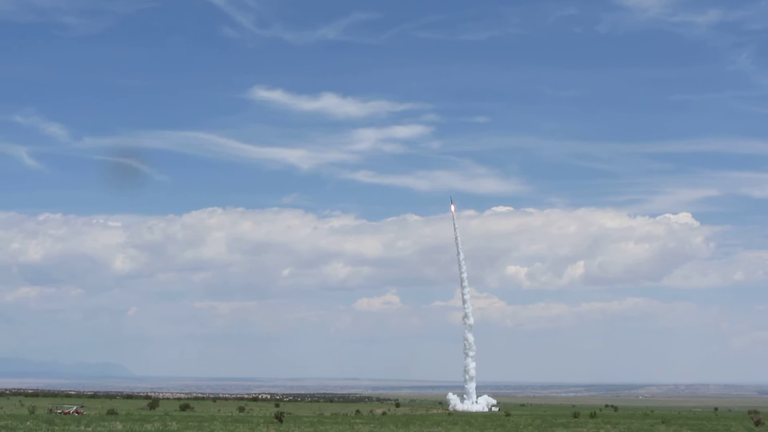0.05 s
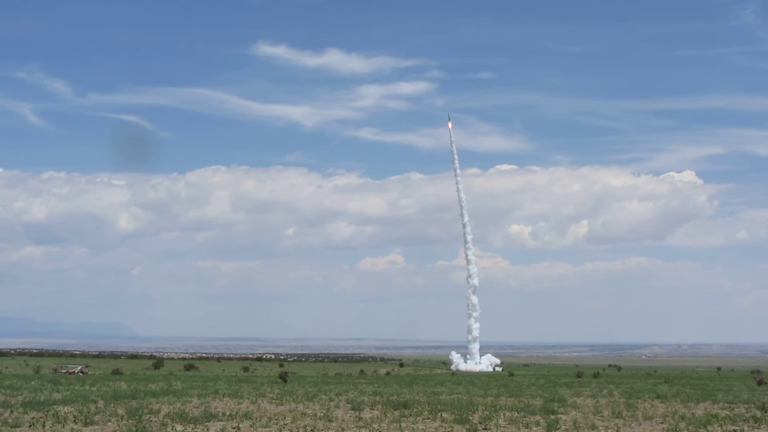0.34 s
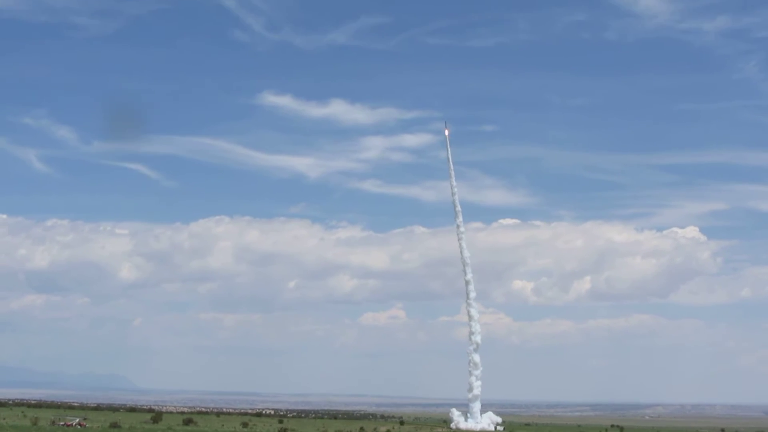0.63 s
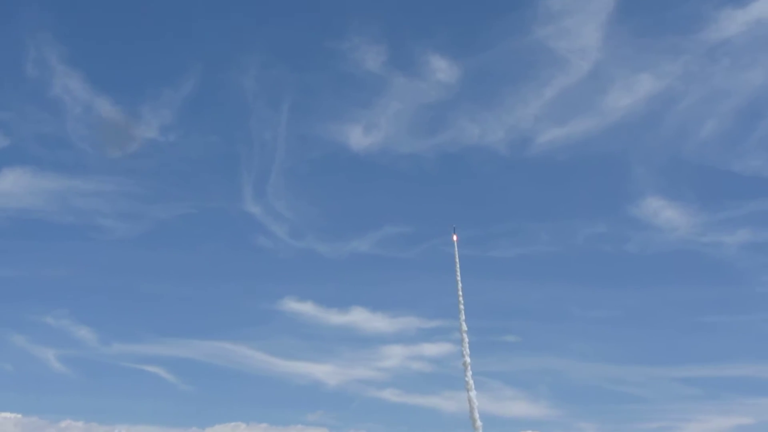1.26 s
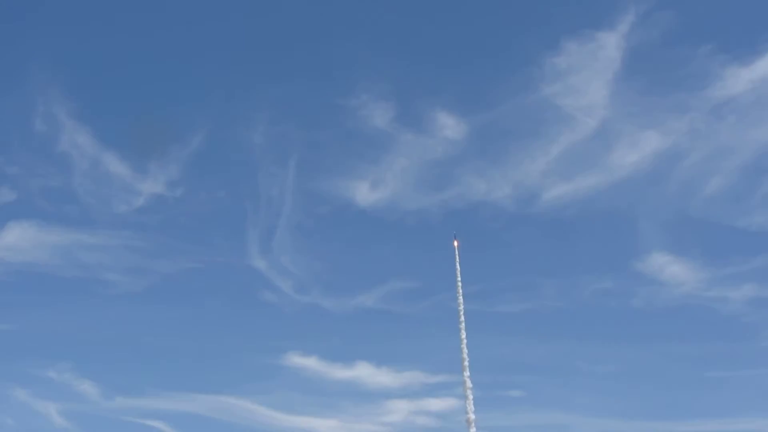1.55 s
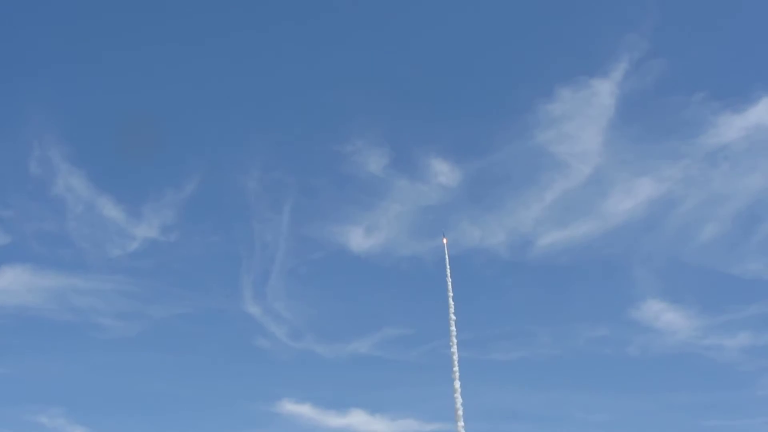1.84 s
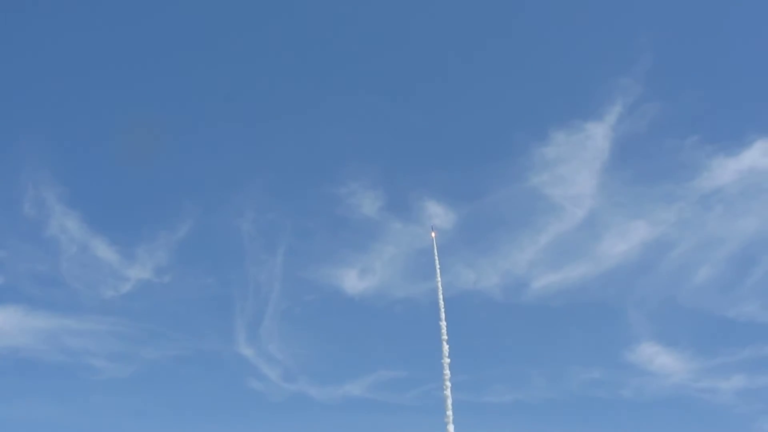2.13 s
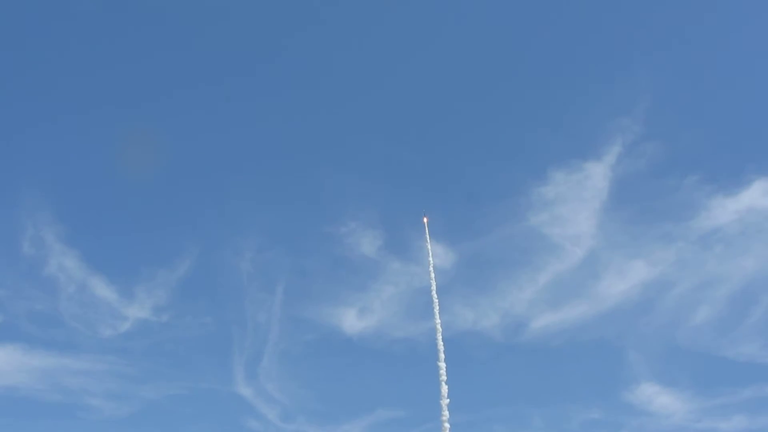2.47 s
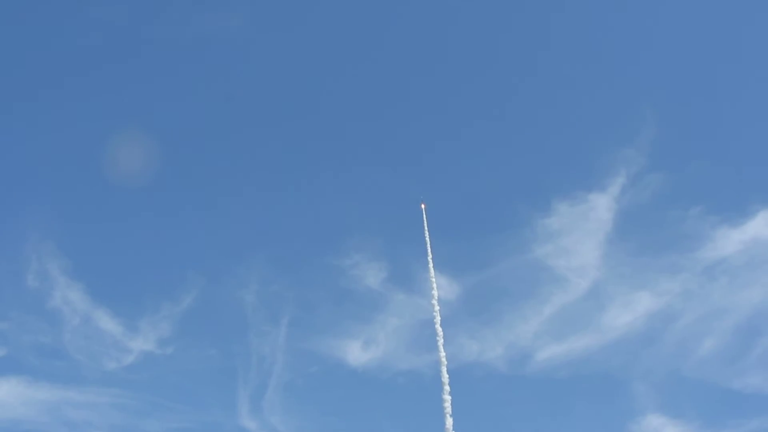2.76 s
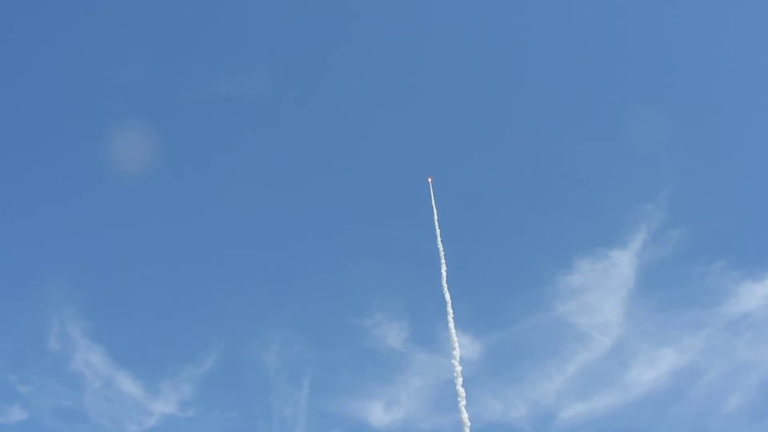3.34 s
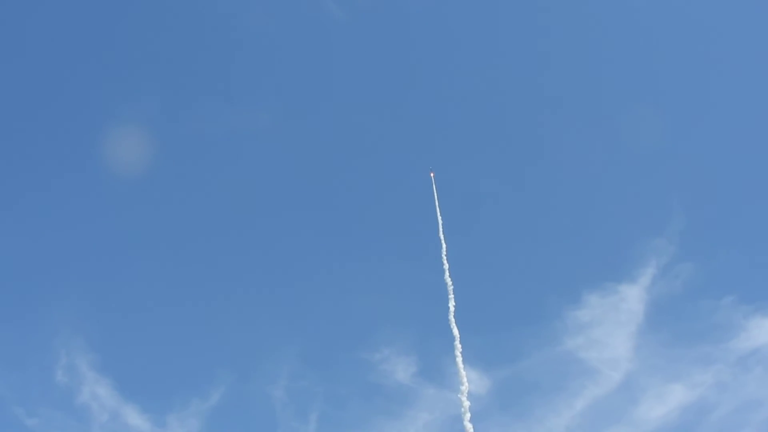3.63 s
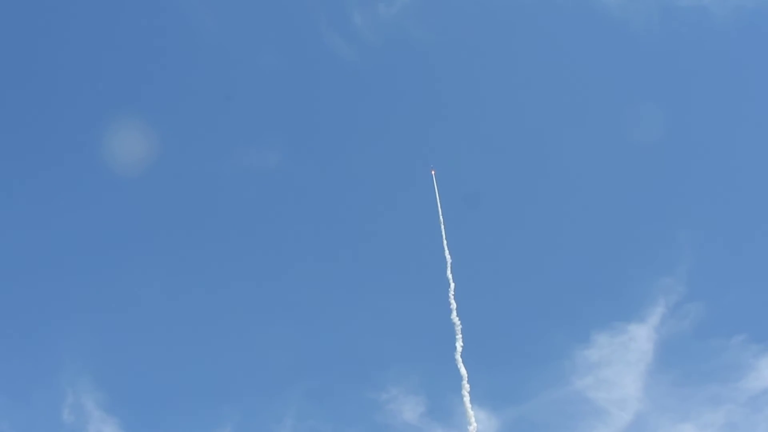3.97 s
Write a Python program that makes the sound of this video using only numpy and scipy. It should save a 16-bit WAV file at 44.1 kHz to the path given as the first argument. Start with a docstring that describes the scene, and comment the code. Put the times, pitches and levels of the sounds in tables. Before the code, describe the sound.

A distant rocket roars throughout, rough and wavering, as it climbs over an open plain. A deep rumble is strongest in the first half second, then eases. The roar surges unevenly, around 0.5, 1.2, 2.2, 2.8 and 3.5 seconds, with short cracks near 0.6, 1.2, 2.6, 2.9 and 3.5 seconds. From about 2 seconds a subtle downward sweep runs through it, and it dulls slightly.

```python
"""A rough roar over a deep rumble: a far-off rocket is climbing away above a grassy plain.
The roar is the jet's churning gas mixed with small shocks (sudden jumps in air pressure). Moving air
makes it swell, fade and change in brightness, and single strong shocks crack through. The echo off
the ground comes later as the rocket rises, so the pitches it cancels slide down through the roar.
Light wind touches the microphone, and the recorder ticks faintly at loud peaks."""
import sys
import numpy as np
from scipy import signal
from scipy.fft import rfft, irfft
from scipy.io import wavfile
from scipy.ndimage import uniform_filter1d, minimum_filter1d, map_coordinates

SR = 44100
rng = np.random.default_rng(int(sys.argv[2]) if len(sys.argv) > 2 else 0)


def waveform_to_disk(signal):
    """Save audio, clipped to [-1, 1], as 16-bit WAV at the path in sys.argv[1]."""
    frames = np.transpose(np.atleast_2d(signal))
    scaled = np.clip(frames, -1, 1) * 32767
    samples = np.round(scaled).astype(np.int16)
    wavfile.write(sys.argv[1], SR, samples)


N = 176400  # 4 seconds

# How each layer swells and fades (time [s], relative level [dB])
ROAR_LEVEL = [(0.0, -16.5), (0.14, -14.5), (0.25, -15), (0.32, -19.5), (0.39, -18.5), (0.46, -12.5),
              (0.54, -20), (0.62, -17.5), (0.66, -17.5), (0.69, -14), (0.84, -27.0), (0.89, -21.5),
              (0.92, -24), (1.02, -18), (1.08, -21), (1.19, -14), (1.39, -20), (1.48, -24.5), (1.59, -20.5),
              (1.73, -25.5), (1.79, -23), (1.92, -24.5), (2.09, -23), (2.13, -16), (2.2, -17.5),
              (2.27, -16.5), (2.31, -25.0), (2.37, -17.5), (2.42, -19), (2.46, -22), (2.5, -20.5),
              (2.58, -20.5), (2.61, -14.5), (2.66, -16.5), (2.69, -18.5), (2.75, -21), (2.79, -16),
              (2.87, -12.5), (2.95, -24.5), (3.02, -18.5), (3.08, -22), (3.2, -17), (3.34, -23.5),
              (3.42, -22), (3.55, -15), (3.65, -20.5), (3.75, -19), (3.79, -17.5), (3.9, -22.5), (4.0, -20)]
TREBLE_LEVEL = [(0.0, -36), (0.12, -31), (0.24, -41.5), (0.36, -44), (0.46, -31.5), (0.51, -34),
                (0.65, -28.5), (0.72, -42), (0.76, -40.5), (0.84, -47.5), (0.9, -39.5), (1.0, -42),
                (1.08, -39), (1.11, -42), (1.19, -34.5), (1.28, -38.5), (1.41, -35.5), (1.45, -40.5),
                (1.62, -42), (1.74, -47.5), (1.79, -44), (1.84, -49.5), (2.05, -49), (2.22, -32),
                (2.3, -42.5), (2.42, -40.5), (2.46, -45), (2.49, -36.5), (2.57, -31), (2.6, -45.5),
                (2.64, -32.5), (2.69, -50), (2.73, -34.5), (2.79, -33), (2.82, -37), (2.92, -36.5),
                (2.95, -40), (3.06, -50.5), (3.13, -38.5), (3.2, -44), (3.33, -46), (3.39, -41.5),
                (3.46, -47), (3.54, -40), (3.61, -47), (3.79, -45.5), (3.84, -50), (4.0, -42)]
RUMBLE_LEVEL = [(0.0, -27), (0.11, -18.5), (0.57, -30), (0.76, -34), (0.92, -24.5), (1.44, -28),
                (1.52, -33.5), (1.86, -32.5), (2.42, -32), (2.76, -34.5), (2.83, -32), (3.05, -35),
                (3.3, -28.5), (3.44, -30.5), (3.77, -28.5), (4.0, -31)]
DEEP_LEVEL = [(0.0, -27.5), (0.23, -38), (0.71, -47.5), (0.92, -48.5), (1.45, -52), (1.61, -45.5),
              (2.05, -44.5), (2.45, -49.5), (3.27, -55), (4.0, -56)]
# How each sound is spread from low to high (frequency [Hz], relative level [dB])
JET_TONE = [(250, -37), (420, -8), (620, 0), (950, -1.5), (1300, -1.94), (2000, -4.5), (2800, -10),
            (3800, -22), (5000, -30), (7000, -52), (10000, -78), (15000, -99)]
RUMBLE_TONE = [(40, -48.5), (90, -17), (150, -6.5), (220, -1), (300, 3), (400, -3.5), (550, -15.5),
               (1000, -41.5), (4000, -87)]
DEEP_TONE = [(20, -26), (35, -23.5), (52, -5.5), (90, 0), (130, 8), (220, -13.5), (1000, -69)]
CRACK_TONE = [(60, -21.5), (250, 4), (800, 9), (2000, -9), (3800, -20.5), (5500, -20), (8000, -43.5),
              (10000, -60.5), (15000, -86)]
RECORDER_TICK_TONE = [(2000, -20), (5000, -1), (8000, 0.5), (11000, -6), (15000, -15)]
# Brief flare-ups in the roar (time [s], centre frequency [Hz], half length [s], boost [dB])
ROAR_FLARES = [(1.361, 680, .09, 8.5), (1.79, 1700, 0.037, 7.5), (2.2, 2100, 0.024, 7.5),
               (2.515, 1305, 0.08, 9.5), (2.642, 1840, 0.012, 6.5), (3.796, 620, 0.057, 7)]
# Loud peaks (time [s], relative shock level [dB], relative recorder tick level [dB])
LOUD_PEAKS = [(.44, -17.5, -47), (.459, -14.5, -42), (0.477, -14.5, -43), (.493, -18.5, -50),
              (.591, -13.5, -50), (.661, -11, -45), (1.121, -16.5, -49), (1.201, -11.5, -44),
              (1.47, -20, -50), (1.799, -20, -44), (2.149, -18, -51), (2.64, -7, -47), (2.8, -22, -60),
              (2.846, -7.5, -60), (2.87, -8, -54), (3.54, -6.5, -59), (3.797, -27, -56)]
# How late the ground echo comes (time [s], delay [ms])
ECHO_DELAY = [(0, 1.48), (1.5, 1.486), (2.0, 1.69), (2.45, 2.474), (2.7, 2.86), (3.08, 3.26), (3.6, 4.11),
              (4, 4.62)]
# How strongly the grass reflects sound (frequency [Hz], gain [dB])
GRASS_ECHO = [(100, -3), (400, -5), (1000, -8), (2000, -11.5), (4000, -17), (8000, -23.5)]
# Stereo balance (frequency [Hz], left minus right [dB])
BALANCE = [(60, 0), (170, 0.5), (460, -0.2), (800, -0.8), (1250, -2), (2200, -2.5), (3600, 0.5),
           (6000, -2.1)]

ROAR_DB, PEAKS_DB, RUMBLE_DB, DEEP_DB, WIND_DB = -1.1, -1, 1, -2.5, -65.5
SHOCKS_PER_S, SHOCK_SPREAD_DB = 1400, 1.5
TREBLE_FROM_HZ, TREBLE_FULL_HZ, TREBLE_LIFT_DB, TREBLE_TYPICAL_DB = 1540, 3180, 19, -29.5
DARKEN_DB_PER_OCTAVE_S, PIVOT_HZ, NEUTRAL_TIME_S = 2, 1150, 2.8
SPUTTER_DB, FLUTTER_DB, GUST_DB = 1.26, 0.9, 9.5
FLARE_OCTAVES, STEEPEN_PER_OCTAVE = 0.4, 0.25
ECHO_WOBBLE_MS, RIGHT_LEAD_MS, SCATTER_DB = 0.09, 0.004, -17.5
LIMIT_PEAK, TOP_HZ = 0.68, 15700


def roar():
    """The jet heard through moving air: it swells, fades and flares, and distance dulls it."""
    jet = rfft(unit(colour(exhaust(), JET_TONE)))
    octaves = np.log2(np.maximum(np.fft.rfftfreq(N, 1 / SR), 1))
    centres_hz = 400 * 2 ** np.arange(0, 4.6, .5)
    t = np.arange(N) / SR
    body = curve(ROAR_LEVEL)
    treble = curve(TREBLE_LEVEL) + SPUTTER_DB * wander(per_s=120)
    out = 0
    # Cut the jet into half-octave bands and move the level of each one.
    for hz, pick in zip(centres_hz, np.eye(len(centres_hz))):
        band = irfft(jet * np.interp(octaves, np.log2(centres_hz), pick), N)
        treble_share = np.interp(np.log(hz), np.log([TREBLE_FROM_HZ, TREBLE_FULL_HZ]), [0, 1])
        darken = -DARKEN_DB_PER_OCTAVE_S * (t - NEUTRAL_TIME_S) * np.log2(hz / PIVOT_HZ)
        # Bright spurts have steeper shocks, so the highest bands swing the most.
        octaves_above = max(np.log2(hz / TREBLE_FULL_HZ), 0)
        steepen = STEEPEN_PER_OCTAVE * octaves_above * (treble - TREBLE_TYPICAL_DB)
        db = (1 - treble_share) * (body + darken) + treble_share * (treble + TREBLE_LIFT_DB + steepen)
        for at, flare_hz, half_length, boost_db in ROAR_FLARES:
            nearness = np.exp(-(np.log2(hz / flare_hz) / FLARE_OCTAVES) ** 2)
            db += boost_db * nearness * np.exp(-((t - at) / half_length) ** 2)
        out += band * undb(db + FLUTTER_DB * wander(per_s=20))
    return out * undb(ROAR_DB)


def exhaust():
    """Churning gas makes noise, mixed at equal power with many small shocks of uneven size."""
    sizes = undb(SHOCK_SPREAD_DB * np.minimum(rng.exponential(size=N), 4))
    shocks = (rng.random(N) < SHOCKS_PER_S / SR) * sizes
    return rng.standard_normal(N) - unit(shocks - shocks.mean())


def cracks():
    """Single shocks crack through the roar with a low-mid knock."""
    times, shock_db, _ = np.transpose(LOUD_PEAKS)
    return pulses(times, shock_db + PEAKS_DB, CRACK_TONE)


def rumble():
    """Big, slow swirls in the exhaust rumble; the deepest die away as the rocket climbs."""
    low = unit(colour(rng.standard_normal(N), RUMBLE_TONE)) * undb(curve(RUMBLE_LEVEL) + RUMBLE_DB)
    deep = unit(colour(rng.standard_normal(N), DEEP_TONE)) * undb(curve(DEEP_LEVEL) + DEEP_DB)
    return low + deep


def add_ground_echo(x):
    """The grass sends back a duller copy, later and later, wavering in the moving air."""
    echo = irfft(rfft(x) * np.minimum(gains(GRASS_ECHO, size=N), 1), N)
    delay_ms = curve(ECHO_DELAY) + ECHO_WOBBLE_MS * wander(per_s=9)
    return x + delay(echo, delay_ms)


def microphone(x):
    """Two close openings: the right hears a little earlier, and scattered sound differs at each."""
    age = np.arange(SR // 20) / SR
    scatter = rng.standard_normal(len(age)) * age * np.exp(-age / 0.011)  # a 50 ms smear
    side = undb(SCATTER_DB) * signal.fftconvolve(x, scatter / np.linalg.norm(scatter))[:N]
    left = colour(x + side, [(hz, db / 2) for hz, db in BALANCE])
    right = colour(delay(x, -RIGHT_LEAD_MS) - side, [(hz, -db / 2) for hz, db in BALANCE])
    return np.array([left, right])


def recorder_ticks():
    """Faint, thin recorder ticks, placed at the listed loud peaks."""
    times, _, tick_db = np.transpose(LOUD_PEAKS)
    return pulses(times, tick_db + PEAKS_DB, RECORDER_TICK_TONE)


def wind():
    """Soft, low puffs of wind push on each microphone opening separately."""
    low_band = signal.butter(2, [30, 120], "bandpass", fs=SR, output="sos")
    puffs = signal.sosfilt(low_band, rng.standard_normal((2, N)))
    gusts = undb(GUST_DB * wander(per_s=2.5))
    return undb(WIND_DB) * unit(puffs * gusts)


def undb(db):
    """Turn decibels into a gain."""
    return 10 ** (np.asarray(db) / 20)


def unit(x):
    """Scale to an average power of 1."""
    return x / np.sqrt(np.mean(x ** 2))


def curve(table):
    """Join (time, value) points with straight lines."""
    return np.interp(np.arange(N) / SR, *np.array(table, float).T)


def wander(per_s):
    """A smooth random drift of typical size 1."""
    hold = int(SR / per_s)
    steps = np.repeat(rng.standard_normal(N // hold + 2), hold)
    return unit(uniform_filter1d(uniform_filter1d(steps, hold), hold)[:N])


def delay(x, ms):
    """Make a sound later, or earlier if ms is negative."""
    return map_coordinates(x, [np.arange(N) - ms * SR / 1000], mode="mirror")


def pulses(times, db, tone):
    """Short pulses with the given peak levels and tone."""
    spikes = np.bincount((times * SR).astype(int), undb(db), N)
    peak = np.abs(colour(signal.unit_impulse(N), tone)).max()
    return -colour(spikes, tone) / peak


def gains(tone, size):
    """Turn (frequency, level) points into a gain for every frequency."""
    points_hz, points_db = np.array(tone, float).T
    hz = np.maximum(np.fft.rfftfreq(size, 1 / SR), 1)
    return undb(np.interp(np.log(hz), np.log(points_hz), points_db))


def colour(x, tone):
    """Filter a sound by (frequency, level) points."""
    cepstrum = irfft(np.log(gains(tone, size=2 * N)))
    # Make the filter ring only after a sound, never before.
    cepstrum[1:N] *= 2
    cepstrum[N + 1:] = 0
    return irfft(rfft(x, 2 * N) * np.exp(rfft(cepstrum)))[:N]


def scene():
    """The rocket and the faint ticks, with the ground echo and the wind."""
    mix = roar() + rumble() + cracks() + recorder_ticks()
    return microphone(add_ground_echo(mix)) + wind()


def record(dry):
    """The recorder quickly turns down the tallest peaks and cuts the very highest pitches."""
    needed_gain = LIMIT_PEAK / np.maximum(np.abs(dry).max(axis=0), LIMIT_PEAK)
    held_gain = minimum_filter1d(needed_gain, size=61)
    smooth_gain = uniform_filter1d(uniform_filter1d(held_gain, size=31), size=31)
    top_cut = signal.ellip(8, .2, 70, TOP_HZ, fs=SR, output="sos")
    return signal.sosfilt(top_cut, dry * smooth_gain)


dry = scene()
out = record(dry)
waveform_to_disk(out)
```